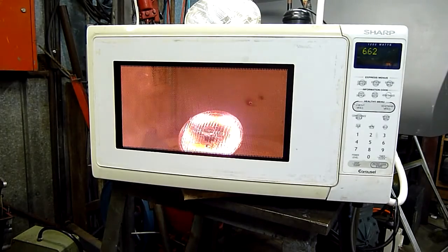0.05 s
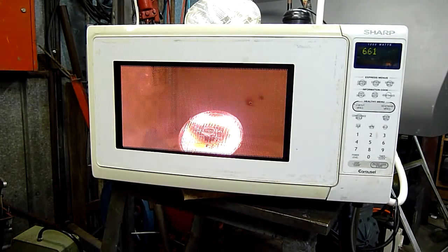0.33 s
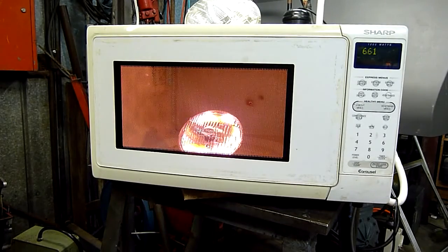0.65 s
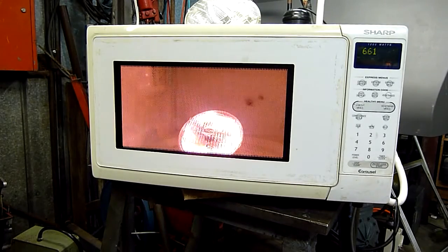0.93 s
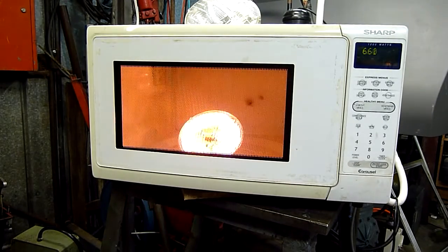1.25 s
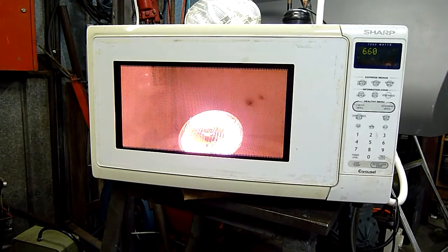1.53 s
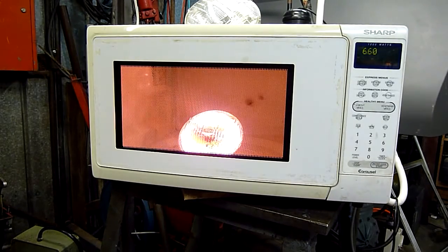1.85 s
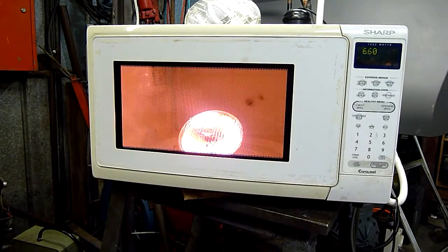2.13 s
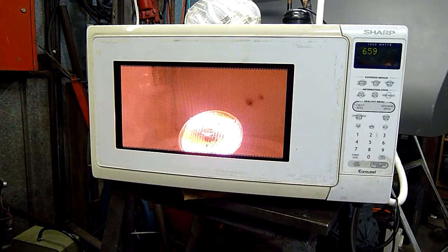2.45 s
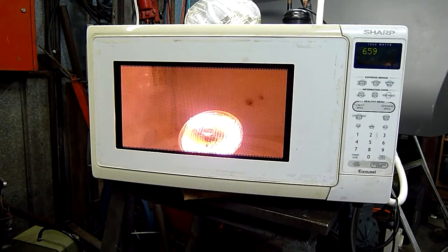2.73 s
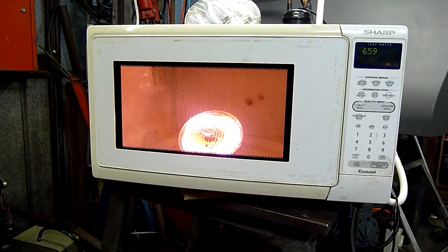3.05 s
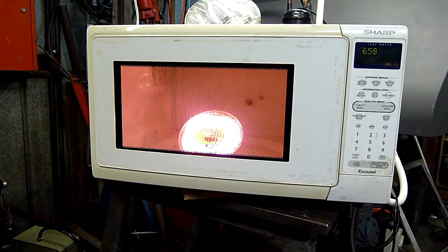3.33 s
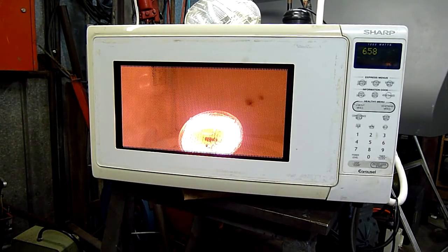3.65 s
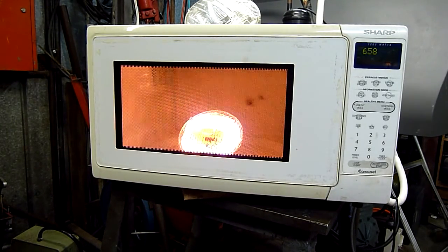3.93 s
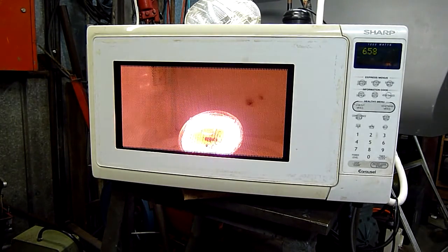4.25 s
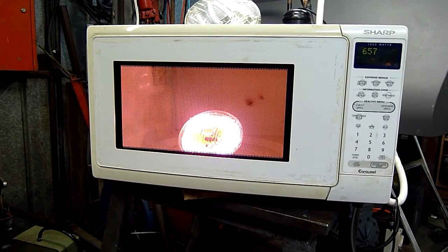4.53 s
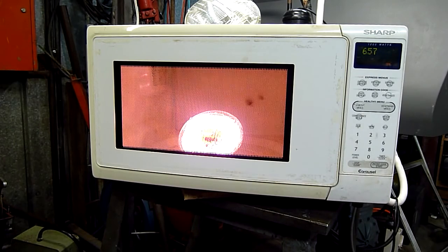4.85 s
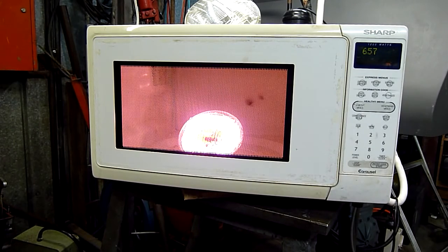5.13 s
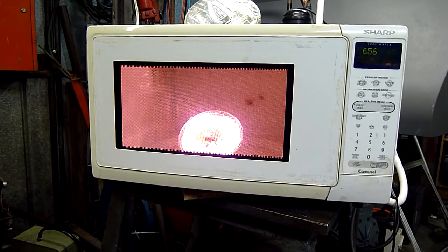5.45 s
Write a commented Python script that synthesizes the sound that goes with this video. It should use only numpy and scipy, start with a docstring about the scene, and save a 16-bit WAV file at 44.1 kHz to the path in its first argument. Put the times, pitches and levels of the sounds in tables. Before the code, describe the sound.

A microwave oven runs throughout, close ahead in a workshop: a steady low electrical hum with rushing air and slightly wavering fan tones. From the start, a glass lamp inside arcs with a bright, rapidly buzzing sizzle, a little to the left, and gives a sharp spit at about 0.2 seconds. From 0.5 seconds the arc breaks into short surges with a very high, glassy ring, loudest and densest between 1.2 and 2.3 seconds. The ringing sizzle carries on with a brief surge near 2.6 seconds, then another loud cluster comes from 3.1 to 4.2 seconds. Sharp spits stand out around 1.5, 3.2, 3.8 and 4.2 seconds. After that the ringing falls away, leaving a quieter crackling hiss with scattered small spits over the hum until about 5.6 seconds. The steel cavity gives the sparks a short metallic smear.

```python
"""In a workshop, a microwave oven runs with a glass lamp inside. The transformer hums at harmonics
of the mains; the fan adds wavering tones and rushing air. The magnetron fires once per mains cycle,
and each time an arc sizzles in the lamp and drives the modes of its glass. From 0.5 to 4.2 s the arc
bites into the glass in loud, ringing surges, and now and then it flares with a sharp spit.
Reverberation in the steel cavity smears the sparks."""
import sys
import numpy as np
from scipy import signal
from scipy.fft import rfft, irfft, next_fast_len
from scipy.io import wavfile
from scipy.ndimage import uniform_filter1d, map_coordinates

SR = 44100
rng = np.random.default_rng(int(sys.argv[2]) if len(sys.argv) > 2 else 0)


def master(y):
    """Save y as 16-bit WAV."""
    cut = np.clip(np.atleast_2d(y).T, -1, 1)
    pcm = np.round(cut * 32767)  # scale
    wavfile.write(sys.argv[1], SR, pcm.astype(np.int16))


N = 246519
TIME = np.arange(N) / SR
MAINS_HZ = 50

# surges of the arc into the glass: t/s, duration/s, level/dB, favoured f/Hz
GLASS_SURGES = [(0.51, 0.033, -29, 8000), (0.806, 0.049, -27, 7460), (1.048, 0.062, -28, 7560),
                (1.188, 0.083, -20.5, 7360), (1.287, 0.02, -16.5, 9600), (1.36, 0.082, -26, 8500),
                (1.622, 0.063, -23.5, 7430), (1.711, 0.11, -23, 7600), (1.859, 0.031, -20, 7770),
                (1.924, 0.019, -20, 7800), (2.008, 0.033, -24, 7540), (2.105, 0.026, -22.5, 7700),
                (2.15, 0.055, -28, 8350), (2.239, 0.073, -22, 9600), (2.59, 0.015, -22, 7440),
                (3.134, 0.02, -27, 7500), (3.305, 0.027, -25, 7400), (3.366, 0.042, -20.5, 7470),
                (3.465, 0.1, -23.5, 7460), (3.664, 0.11, -22, 9200), (3.894, 0.1, -20.5, 7450),
                (4.087, 0.028, -20.5, 7600)]
# low rasp of sparks and flares: f/Hz, relative spectral level/dB
RASP_SPECTRUM = [(500, -43), (1200, 2), (2050, -2), (2450, -3), (3000, -1.5), (4000, -5.5), (5300, -0.5),
                 (8000, -11.5), (16000, -20.5)]


def amp(db):
    """Amplitude ratio of a level in decibels."""
    return 10 ** (np.asarray(db) / 20)


def unit(x):
    """Normalisation to unit rms."""
    return x / np.sqrt(np.mean(x ** 2) + 1e-20)


def along(points, hz):
    """Interpolation of (f/Hz, value) points on a logarithmic frequency axis."""
    f, values = np.transpose(points)
    return np.interp(np.log(hz + 1), np.log(f + 1), values)


def wobble(rate):
    """Slow random modulation: a spline through rate Gaussian values a second."""
    return map_coordinates(rng.standard_normal(int(N * rate / SR) + 4), [TIME * rate])


def filtered(x, response):
    """Linear filtering: the spectrum is multiplied by a frequency response."""
    size = next_fast_len(N + SR // 2)
    return irfft(rfft(x, size) * response(np.fft.rfftfreq(size, 1 / SR)), size)[..., :N]


def coloured(x, spectrum):
    """Spectral shaping at unit mean power gain."""
    return filtered(x, lambda hz: unit(amp(along(spectrum, hz))))


def steady(x, size):
    """Division by the first channel's running rms evens out swells longer than size samples."""
    power = uniform_filter1d(np.atleast_2d(x)[0] ** 2, size)
    return x / np.sqrt(np.abs(power) + 1e-12)


def add(track, start, sound):
    """Superposition of a sound on a track from sample start on."""
    track[..., start:start + sound.shape[-1]] += sound[..., :N - start]


def transformer_hum():
    """Periodic forcing by the mains gives a harmonic series."""
    # hum partials: harmonic number, level/dB
    harmonics = [(2, -63), (3, -56.5), (4, -43.5), (5, -48), (6, -46), (8, -50), (10, -47.5), (21, -89),
                 (23, -70.5)]
    return sum(amp(db) * np.sin(2 * np.pi * (k * MAINS_HZ * TIME + rng.random())) for k, db in harmonics)


def fan_tones():
    """Phase modulation by the unsteady shaft makes the higher tones waver most."""
    # tones of fan and motor: f/Hz, level/dB
    partials = [(173.6, -49.3), (221, -57), (312, -53), (347, -57), (521, -52), (694.4, -59), (781, -55.5),
                (866, -60), (879, -61), (980, -62)]
    shaft_time = TIME + 0.00038 * wobble(4)
    return sum(amp(db + 2.5 * wobble(7)) * np.sin(2 * np.pi * (hz * shaft_time + rng.random()))
               for hz, db in partials)


def fan_air():
    """Rushing air is broadband noise, uncorrelated between mid and side."""
    # air noise: f/Hz, relative spectral level/dB
    spectrum = [(20, -27), (40, -10), (85, -10.5), (130, -8.5), (175, 4), (230, 0), (330, -0.5), (420, -3),
                (520, 1.5), (640, -4), (850, -3.5), (1200, -9.5), (2500, -15), (15000, -20.5)]
    return amp(-38) * coloured(rng.standard_normal((2, N)), spectrum)


def arc_levels():
    """Level envelopes of the steady arc; ring and hiss dip briefly when it falters."""
    # steady arc: t/s, then relative level/dB of glass ring, hiss and low rasp
    levels = [(0.0, -30, -35, -37.5), (0.89, -28.5, -32, -37), (1.04, -27, -28.5, -41.5),
              (1.2, -25, -39.5, -42.5), (1.62, -27.5, -30, -40), (1.85, -29, -38, -39),
              (2.07, -22, -31, -42.5), (3.11, -30.5, -32.5, -40), (3.58, -23.5, -33.5, -46.5),
              (3.83, -24.5, -35, -41.5), (4.06, -30, -39, -44.5), (4.28, -40, -40.5, -43),
              (5.2, -41, -38.5, -44), (5.59, -38.5, -42.5, -45.5)]
    # falters of the arc: t/s, depth/dB
    falters = [(0.41, 6), (0.92, 5.5), (1.58, 4), (3.458, 11), (3.845, 2), (4.06, 11), (4.53, 6),
               (4.615, 3)]
    times, *columns = np.transpose(levels)
    ring_db, hiss_db, rasp_db = [np.interp(TIME, times, column) for column in columns]
    dip_db = sum(depth * np.exp(-((TIME - s) / 0.015) ** 2) for s, depth in falters)
    return ring_db - dip_db, hiss_db - dip_db, rasp_db


def discharge(age, strike_db, burn_s=0.01):
    """Envelope of a discharge: an exponential transient on top of a short burn."""
    since = np.maximum(age, 0)
    strike = amp(strike_db) * np.exp(-since / 0.00096)
    return (age >= 0) * (1 + strike) / (1 + (since / burn_s) ** 8)


def crackle(spread_db):
    """Noise with log-normal amplitude modulation: dense tiny sparks of unequal size."""
    size = np.repeat(rng.standard_normal(N // 8 + 1), 8)[:N]
    return unit(rng.standard_normal(N) * amp(spread_db * np.clip(size, -2.5, 2.5)))


def sparks(scatter_db, idle_db):
    """Periodic gating: the arc relights each mains cycle at a random strength, over an idle floor."""
    cycle, phase = np.divmod(TIME * MAINS_HZ + 0.57, 1)
    strengths = amp(scatter_db * rng.uniform(-1, 1, int(cycle[-1]) + 1))
    gate = strengths[cycle.astype(int)] * discharge(phase / MAINS_HZ, strike_db=6.5) + amp(idle_db)
    return steady(gate * crackle(spread_db=3.5), size=2646)


def cavity_reverb(x, wet_db):
    """Convolution with random early reflections and a diffuse tail, for one position of the arc."""
    # reverberation time of the cavity: f/Hz, T60/s
    decay_times = [(500, 0.086), (3000, 0.28), (15000, 0.057)]
    hz, t, noise = signal.stft(rng.standard_normal((2, SR // 4)), SR, nperseg=256)
    decay = amp(-60 * t / along(decay_times, hz)[:, None])
    tail = signal.istft(noise * decay, SR, nperseg=256)[1]
    early = rng.standard_normal(tail.shape) * amp(-60 * TIME[:tail.shape[1]] / 0.0095)
    response = unit(early) + amp(wet_db) * unit(tail)
    return signal.fftconvolve(x[None], response / np.linalg.norm(response[0]), axes=1)


def arc_sizzle(surges):
    """Noise modulated at the mains rate buzzes; it grows louder and more even as the arc bites."""
    # bright hiss of the sparks: f/Hz, relative spectral level/dB
    hiss_spectrum = [(1500, -35.5), (4000, -10.5), (5300, -13.5), (6300, -4), (7500, -2.5), (8200, -1.5),
                     (9300, 2), (10500, 3.5), (11600, 1), (12600, 2.5), (14500, -3.5), (15700, 5)]
    ring_db, hiss_db, rasp_db = arc_levels()
    bite = np.linalg.norm(surges, axis=0)
    bite_db = 20 * np.log10(np.hypot(bite, amp(ring_db)))
    train = sparks(scatter_db=7.5, idle_db=0.61 * (bite_db + 23.5))
    sizzle = np.zeros((2, N))
    stay = 2 * SR // MAINS_HZ  # the arc moves on every other cycle
    for start in range(0, N, stay):
        add(sizzle, start, cavity_reverb(train[start:start + stay], wet_db=2))
    hiss = np.hypot(amp(hiss_db + 6), amp(-8) * bite) * sizzle
    rasp = amp(rasp_db - 4) * sizzle
    return coloured(hiss, hiss_spectrum) + coloured(rasp, RASP_SPECTRUM)


def box_resonance(x, width_hz, ring_db):
    """Resonances of the steel box raise Lorentzian peaks in the sound leaking through its door."""
    # strongest box modes: f/Hz, relative level/dB
    modes = [(2070, 0), (2970, -1), (3190, -2), (3550, -3), (5080, 0), (5380, -1), (5940, -2), (6250, -3),
             (6850, 0), (8300, -3), (8580, -1), (9220, 2), (9470, -2), (10030, -2), (10250, 0), (10650, -3),
             (11020, -1), (11240, -1), (11710, -2), (12270, -2), (12450, -2), (12700, 0), (13910, -2),
             (14080, -1), (14510, -1), (15000, -2), (15550, -1)]

    def response(f):
        power = sum(amp(2 * (db + ring_db)) / (1 + ((f - hz) / (width_hz / 2)) ** 2) for hz, db in modes)
        return unit(np.sqrt(1 + power))
    return filtered(x, response)


def glass_ring(surges):
    """Forced resonance: sparks drive the lamp's modes, and each surge favours those near one pitch."""
    # modes of the glass: f/Hz, bandwidth/Hz, relative level/dB
    modes = [(5200, 90, -27), (5990, 50, -25), (6708, 12, -14), (6945, 50, -16), (7430, 40, -17),
             (7585, 26, -1), (7640, 25, -8), (7693, 24, 0), (8479, 16, 0), (8549, 20, -1), (9012, 18, -3),
             (9100, 45, -8), (9368, 32, 1), (9528, 14, -11), (10195, 60, -10), (10860, 45, -6),
             (10935, 40, -11), (12320, 50, -15), (12530, 80, -16), (12720, 90, -14), (13490, 50, -10),
             (13900, 60, -12), (15600, 160, -19)]
    # mode families: centre f/Hz, level/dB re the steady ring, least level/dB re a surge
    families = [(7670, -4.5, -2.5), (8240, -10.5, -14), (9200, -4, -4.5)]
    # boundaries of the families: f/Hz
    edges = [0, 8000, 8800, 20000]
    favour_width_hz, grip_db = 850, -42
    drive = sparks(scatter_db=10, idle_db=11)
    ring_db = arc_levels()[0]
    favoured_hz = np.transpose(GLASS_SURGES)[-1]
    ring = np.zeros((2, N))
    for (centre_hz, steady_db, spill_db), low, high in zip(families, edges, edges[1:]):
        family = np.zeros((2, N))
        for k, (hz, width, db) in enumerate(mode for mode in modes if low < mode[0] <= high):
            mid_side = (-1) ** k * np.array([1, rng.choice([1j, -1j])])  # left or right leads in phase
            resonator = lambda f: np.outer(mid_side, 1j * f * width / (hz**2 - f**2 + 1j * f * width))
            family += filtered(drive * amp(db + 1.1 * wobble(5.5)), resonator)
        closeness = np.exp(-((favoured_hz - centre_hz) / favour_width_hz) ** 2)
        coupling = np.maximum(closeness, amp(spill_db))
        surging = np.linalg.norm(coupling[:, None] * surges, axis=0)
        wandering = amp(ring_db + steady_db + 1.86 * wobble(14))
        envelope = np.hypot(wandering, surging)
        grip = 1 / np.sqrt(1 + amp(grip_db) / envelope)  # a weak arc barely takes hold of the glass
        ring += grip * envelope * steady(family, size=1500)
    return amp(-0.43) * ring


def small_flares(count):
    """Random point events that scale with the arc: rows of t/s, spit level/dB, rasp level/dB."""
    _, hiss_db, rasp_db = arc_levels()
    when, luck = rng.random((count, 2)).T
    at = (when * N).astype(int)
    scatter_db = 1 - 2 * luck
    return list(zip(at / SR, hiss_db[at] + 12.5 + scatter_db, rasp_db[at] - 4 + scatter_db))


def flares():
    """Single discharges are noise bursts that decay exponentially in the box; the fattest also pop."""
    # strong flares: t/s, relative spit level/dB, relative rasp level/dB
    strong_flares = [(0.1728, -10.5, -33.5), (0.3502, -20.5, -39), (0.5288, -26, -32), (0.8504, -20, -32),
                     (0.9736, -21, -33), (1.528, -10.5, -31.5), (2.8521, -12.5, -40), (3.169, -11.5, -33.5),
                     (3.769, -7.5, -33), (3.911, -8.5, -39), (4.2105, -11.5, -39), (4.2297, -8.5, -40),
                     (4.2703, -12, -48), (4.4716, -15.5, -41), (4.551, -15, -47), (4.6303, -16, -43),
                     (4.7108, -15.5, -57), (4.907, -17.5, -46), (5.127, -19.5, -46), (5.18, -18, -41),
                     (5.348, -17.5, -54)]
    # bright spit: f/Hz, relative spectral level/dB
    spit_spectrum = [(1500, -34), (3500, -7), (5100, 1), (6200, -4.5), (8000, 1), (9300, 4.5),
                     (11000, -0.5), (13000, 2.5), (15700, -3)]
    # low pop: f/Hz, relative spectral level/dB
    pop_spectrum = [(300, -19), (850, 2), (1400, -5), (2000, 4), (4000, -9), (12000, -44)]
    spit, rasp, pop = np.zeros((3, 2, N))
    age = TIME[:SR // 5]
    tail = 1.29 * amp(-60 * age / 0.19)
    envelope = np.hypot(discharge(age, strike_db=-13), tail)
    for s, spit_db, rasp_db in strong_flares + small_flares(count=24):
        start = round(s * SR)
        burst = envelope * rng.standard_normal((2, len(age)))
        add(spit, start, amp(spit_db - 16.5) * burst)
        add(rasp, start, amp(rasp_db - 5) * burst)
        add(pop, start, amp(1.82 * rasp_db + 13) * burst)  # the low end grows fastest with size
    return coloured(spit, spit_spectrum) + coloured(rasp, RASP_SPECTRUM) + coloured(pop, pop_spectrum)


def surge(s, length, db, attack_s=0.0037, sag_db_per_s=28, t60_s=0.21):
    """Exponential attack and decay: a surge catches fast, sags while it holds, and dies away."""
    age = np.maximum(TIME - s, 0)
    fall_db = sag_db_per_s * age + 60 * np.maximum(age - length, 0) / t60_s
    return (1 - np.exp(-age / attack_s)) * amp(db - fall_db)


def scene():
    """Mid-side superposition: the oven stands just ahead, the lamp a little to the left."""
    # stereo width: f/Hz, gain of the side signal/dB
    side_gain = [(30, -15), (70, -8), (150, -17.5), (500, -15.5), (1000, -8.5), (2000, -14.5), (5000, -11),
                 (9000, -8.5), (14000, -4.5)]
    # stereo balance: f/Hz, left minus right level/dB
    balance = [(100, -0.7), (2000, 0.3), (4000, 0.4), (8000, 2), (13000, 2.5)]
    surges = np.array([surge(s, length, db) for s, length, db, _ in GLASS_SURGES])
    tones = np.sqrt(2) * np.outer([1, 0.6], transformer_hum() + fan_tones())
    air = fan_air()
    arc = box_resonance(arc_sizzle(surges) + flares(), width_hz=17.6, ring_db=8.5)
    mid, side = tones + air + arc + glass_ring(surges)
    side = filtered(side, lambda hz: amp(along(side_gain, hz)))
    left_right = np.array([mid + side, mid - side])
    return filtered(left_right, lambda hz: amp(np.outer([0.5, -0.5], along(balance, hz))))


def record(dry):
    """Band limiting: an ideal low-pass filter removes the highest treble."""
    return filtered(dry, lambda hz: hz < 15780)


dry = scene()
out = record(dry)
master(out)
```